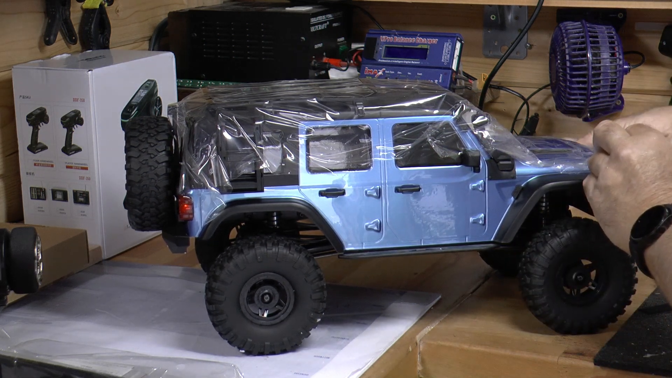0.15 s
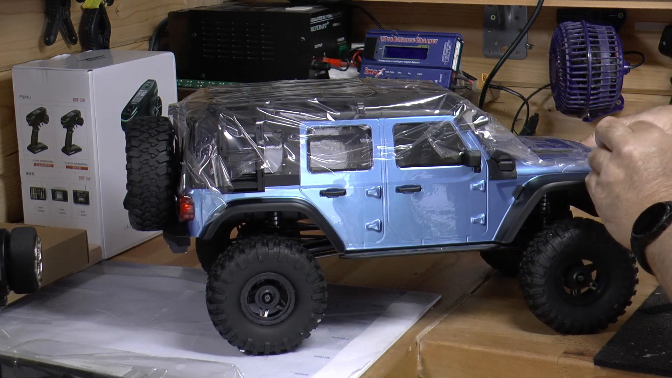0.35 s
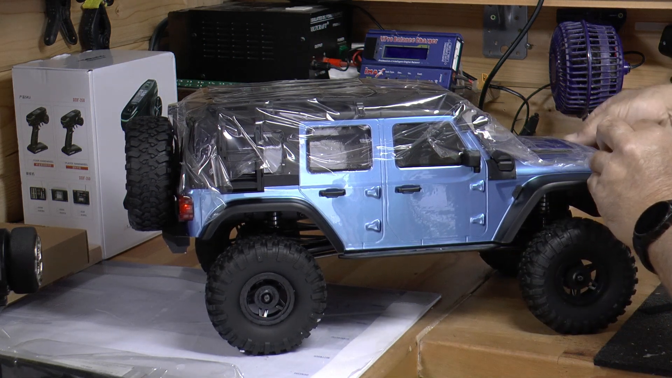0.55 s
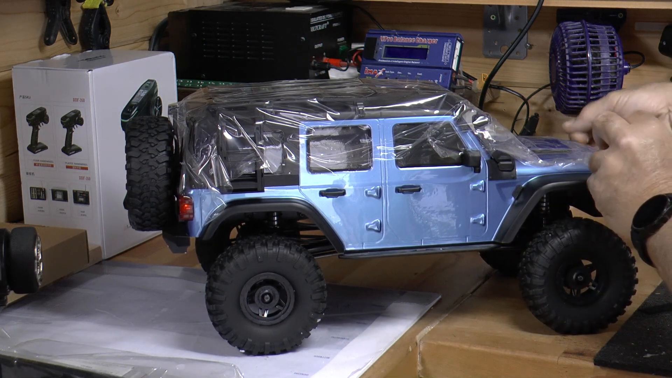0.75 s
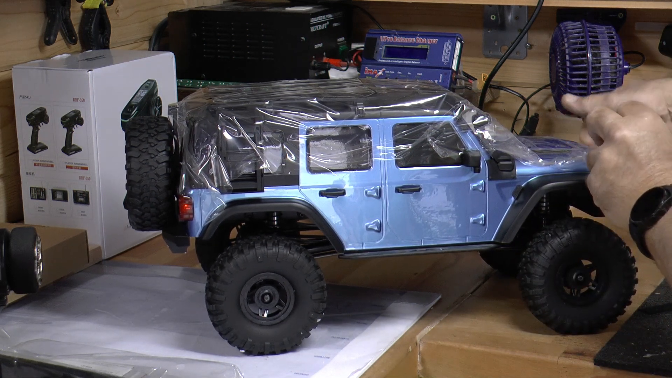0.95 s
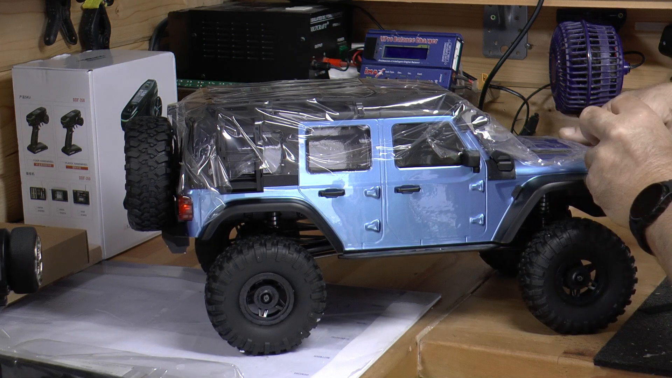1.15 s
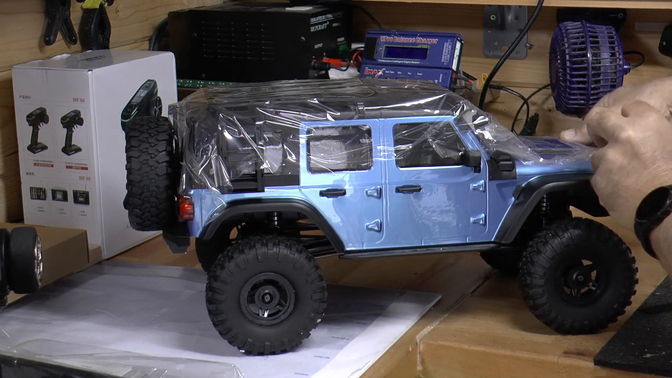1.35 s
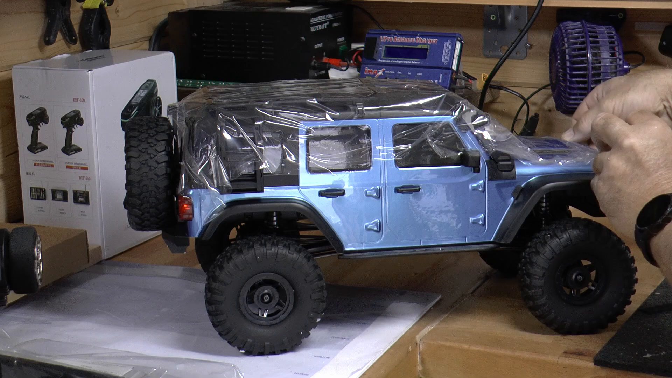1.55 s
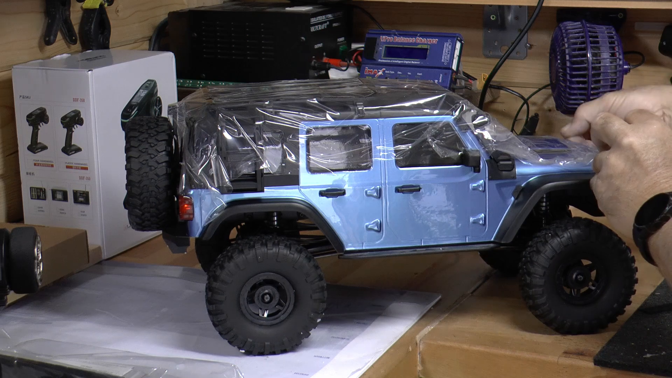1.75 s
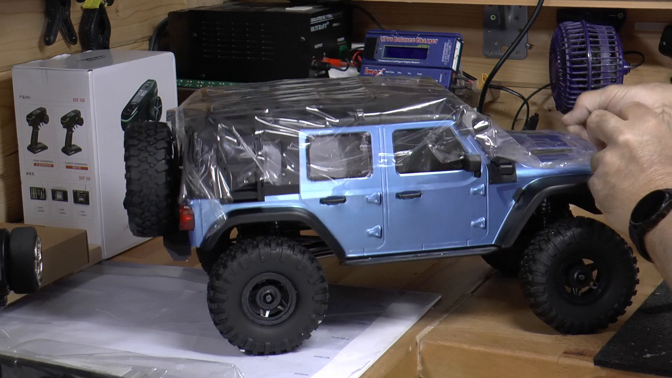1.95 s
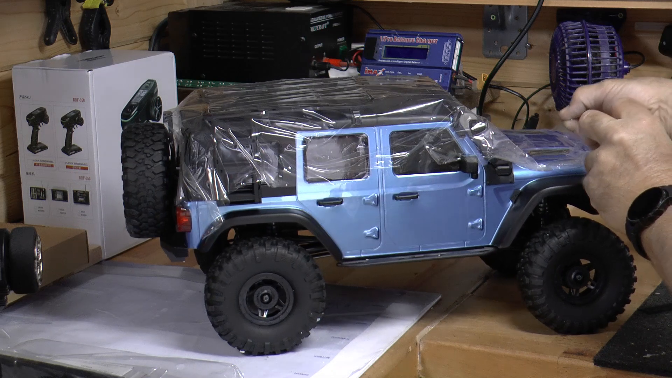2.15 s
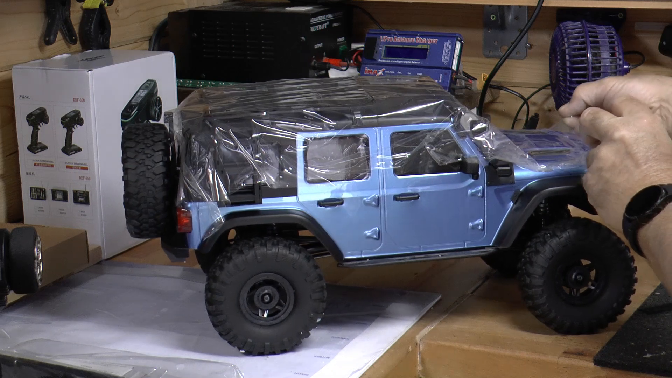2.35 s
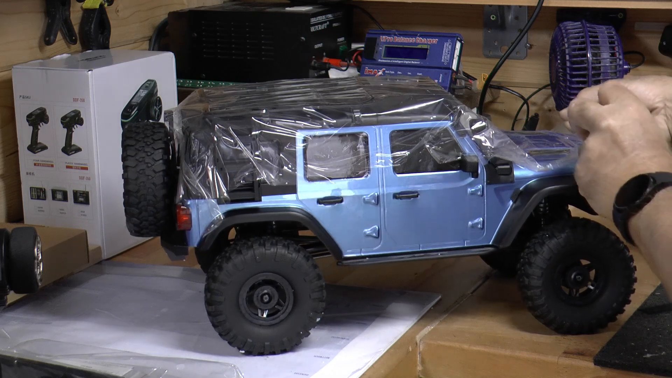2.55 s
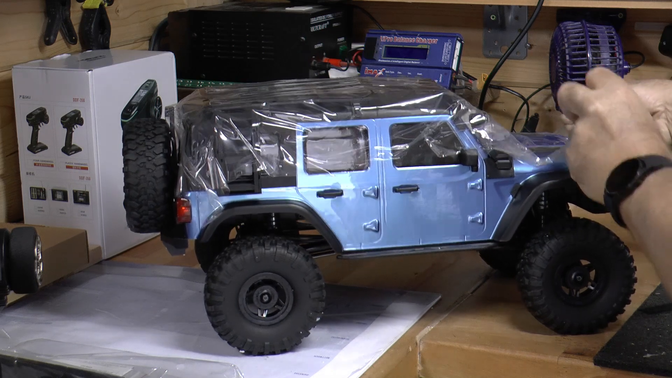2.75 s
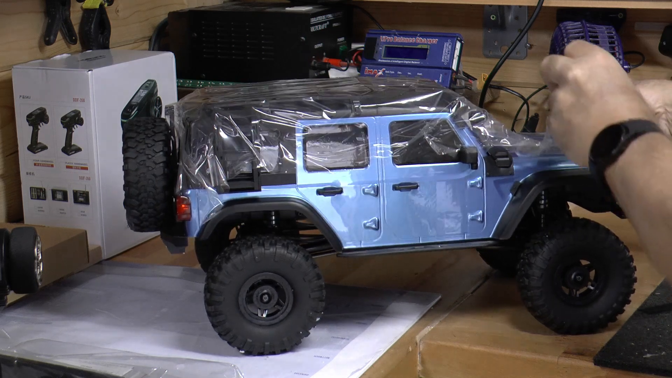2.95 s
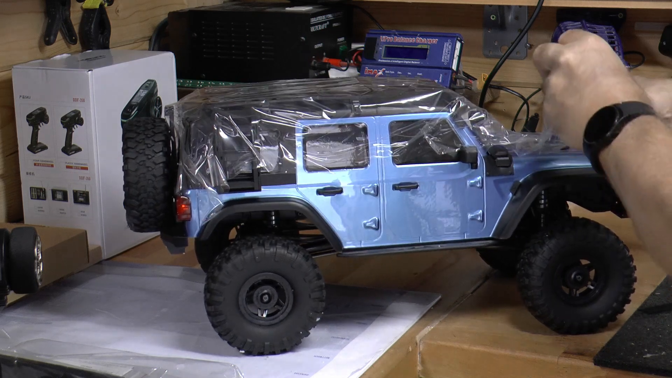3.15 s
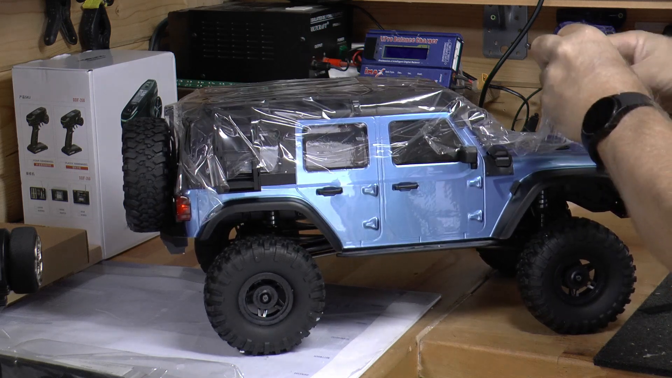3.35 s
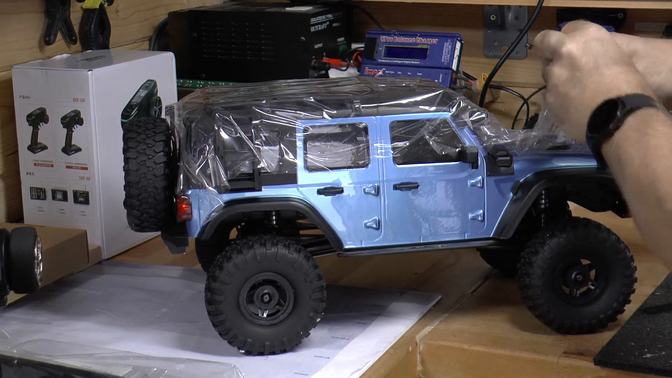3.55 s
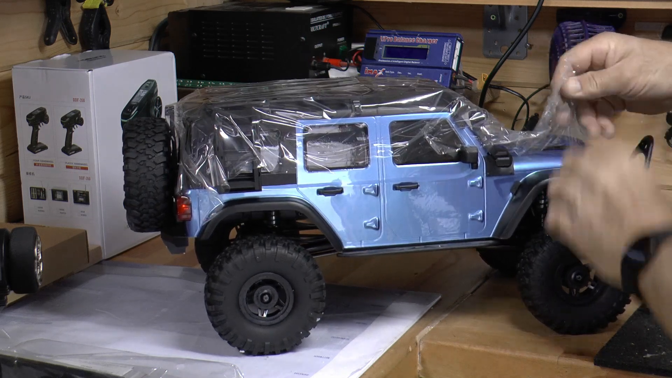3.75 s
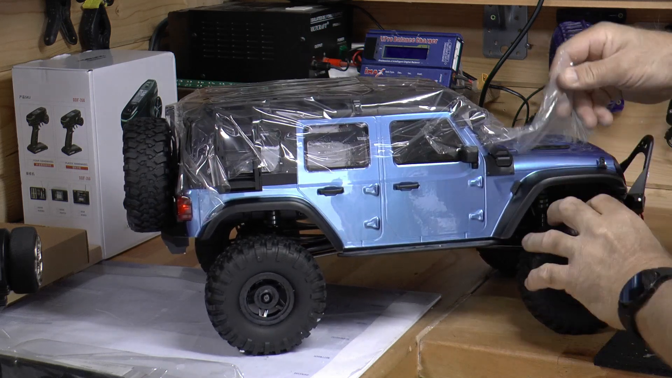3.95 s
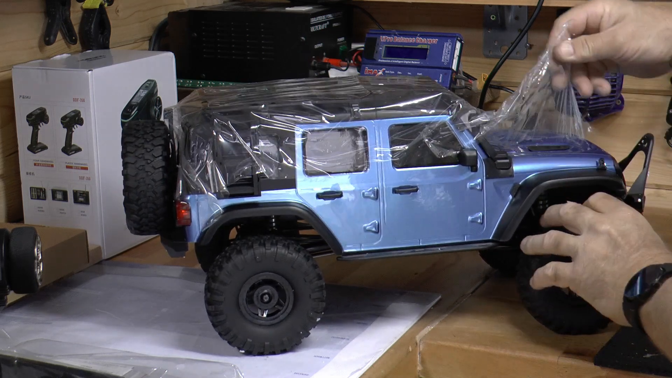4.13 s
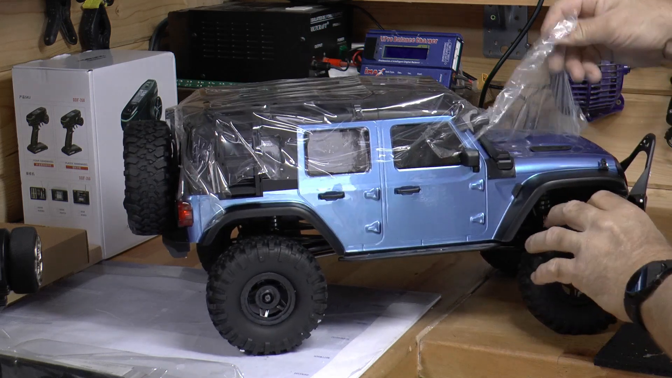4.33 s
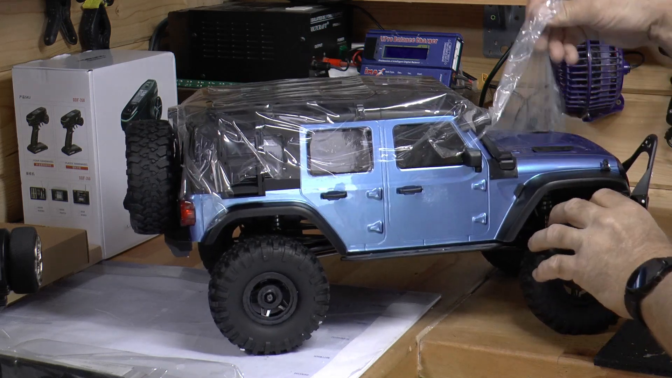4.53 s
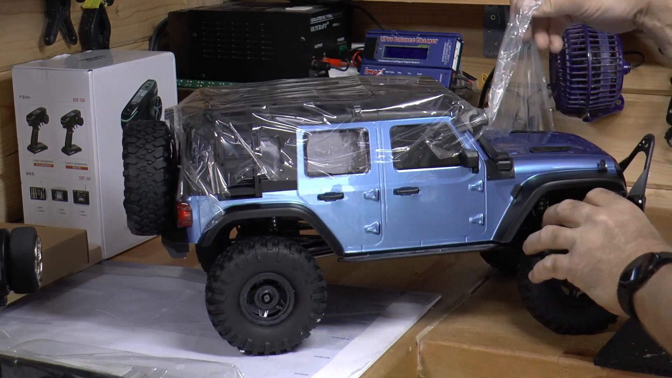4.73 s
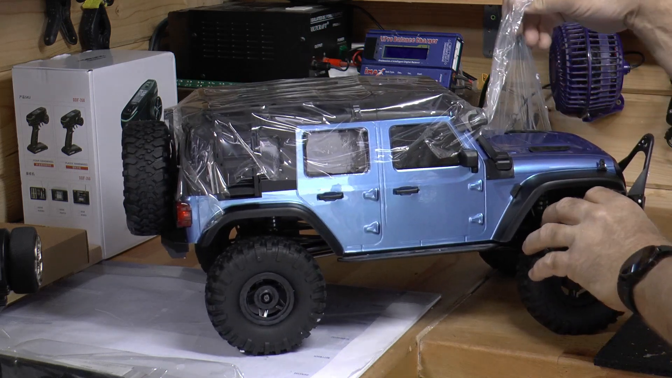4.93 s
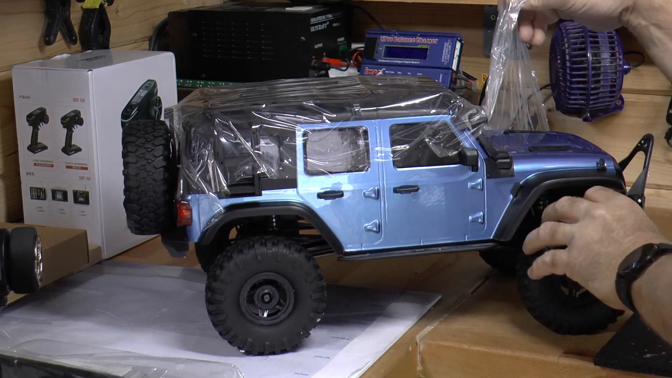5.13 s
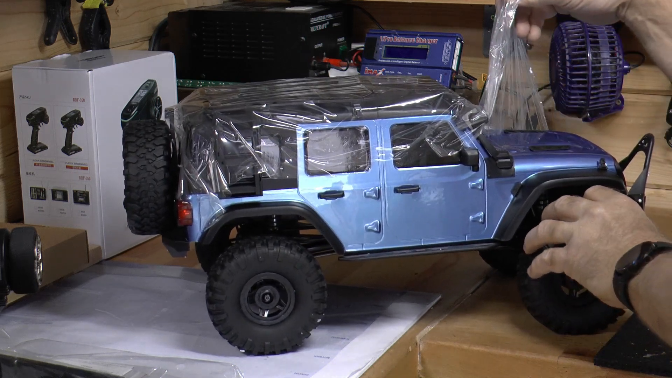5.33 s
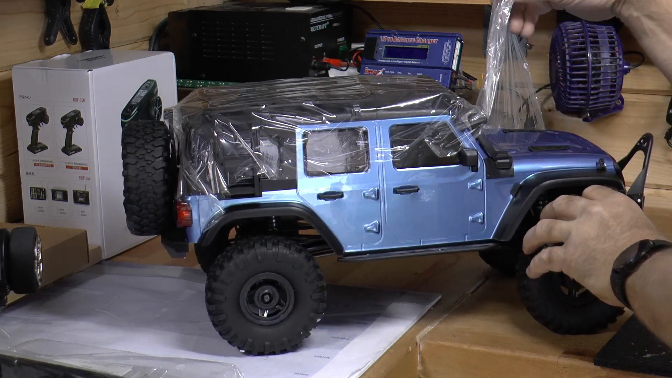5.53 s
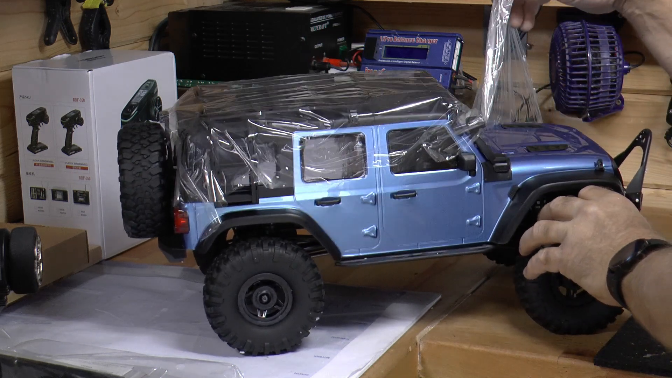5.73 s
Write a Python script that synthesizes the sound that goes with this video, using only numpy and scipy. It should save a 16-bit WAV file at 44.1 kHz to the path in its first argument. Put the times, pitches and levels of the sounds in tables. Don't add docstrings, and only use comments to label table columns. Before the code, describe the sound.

Thin, stiff plastic film is worked loose from a hollow toy vehicle on a workshop bench, heard close and slightly right of centre with a short, small-room tail. At first there are only small ticks and faint rustle, with sharper snaps around 0.5 and 0.8 s. From 1 to 1.6 s it is sparse and quiet; then crackling thickens, with strong snaps near 2.0, 2.5 and 2.8 s and a loud rip at 2.9. Softer tearing and rustling run from 3.0 to 3.7 s, with a dull bump about 3.4. Loud snaps and dense rips break out at 4.0-4.1 and 4.3-4.7 s, making the shell knock hollowly. A hard crack at 5.0 is followed by dry ticks, then a loud cluster around 5.4. A tiny quickening creak at 5.6 leads to a short tear and fading ticks. Low room hum and faint hiss continue throughout.

```python
import sys
import numpy as np
from scipy import signal
from scipy.fft import rfft, irfft
from scipy.io import wavfile
from scipy.ndimage import uniform_filter1d

SR = 44100
rng = np.random.default_rng(int(sys.argv[2]) if len(sys.argv) > 2 else 0)


def attenuation_scalar(level_db):
    decades = np.asarray(level_db, float) / 20
    return 10 ** decades


def materialize(psi):
    bounded = np.clip(np.atleast_2d(psi).T, -1, 1)
    quanta = np.round(bounded * 32767).astype(np.int16)
    wavfile.write(sys.argv[1], SR, quanta)


N = 259746


def evened(x):
    return x / np.sqrt(np.mean(x ** 2) + 1e-20)


def read(points, hz):
    f, value = np.transpose(points)
    return np.interp(np.log(hz + 1), np.log(f + 1), value)


def add(mix, start_s, sound):
    part = mix[round(start_s * SR):][:len(sound)]
    part += sound[:len(part)]


def snaps():
    # start_s, peak_db, pitch_hz, brightness_db
    corner_snaps = [(0.4988, -13, 4430, -25), (0.5249, -18, 6100, -11.5), (0.7755, -17, 7600, -12.5),
                    (0.825, -15, 3200, -17.5), (0.856, -19, 4300, -12), (0.865, -10.5, 4360, -11),
                    (1.3623, -22, 3480, -14), (1.6356, -24, 3500, -20), (1.7512, -19.5, 10400, -7),
                    (1.7722, -18.5, 4360, -19), (1.91, -17.5, 9900, -2), (1.9323, -18.5, 1370, -37),
                    (2.0067, -14.5, 9100, -13), (2.0272, -9, 9700, -9.5), (2.0763, -14, 4170, -15),
                    (2.173, -22.5, 3100, -22), (2.1904, -13.5, 4230, -12), (2.2434, -14.5, 3270, -17),
                    (2.2794, -14.5, 4000, -13), (2.3545, -12, 3230, -16.5), (2.4074, -15, 5860, -18.5),
                    (2.445, -17.5, 4800, -12), (2.4662, -8, 2500, -16.5), (2.482, -4.5, 2520, -18.5),
                    (2.5181, -8, 2450, -18), (2.6726, -17.5, 4040, -12), (2.7567, -4.5, 2520, -15.5),
                    (2.8263, -9, 4220, -17), (2.8646, -16.5, 2310, -17), (2.887, -12.5, 2460, -18)]
    pull_snaps = [(2.907, -3, 2480, -18), (2.9948, -12, 5300, -18.5), (3.242, -14.5, 5950, -12),
                  (3.6317, -12.5, 3950, -16), (3.98, -19, 2650, -15), (3.9932, -4.5, 4420, -18),
                  (4.008, -6, 3720, -19), (4.0908, -11.5, 1700, -28), (4.2257, -22, 4100, -19.5),
                  (4.332, -19, 1930, -11), (4.3395, -10.5, 4900, -12), (4.445, -8.5, 1960, -24.5),
                  (4.4541, -10.5, 4430, -16), (4.4888, -15.5, 2980, -20), (4.5148, -3.5, 2880, -12.5),
                  (4.5317, -7.5, 1810, -26), (4.7037, -19.5, 4400, -18), (4.731, -18, 4500, -19),
                  (4.7673, -16.5, 4580, -20), (4.797, -14.5, 4970, -17.5), (4.8203, -15.5, 2660, -20),
                  (4.8662, -16, 1910, -41), (5.028, -2.5, 5940, -19), (5.1626, -14.5, 5200, -12),
                  (5.2966, -16.5, 4100, -13), (5.3803, -6.5, 3960, -19.5), (5.4045, -2, 4200, -18),
                  (5.4488, -3.5, 4480, -25.5), (5.4637, -5.5, 4100, -15.5), (5.672, -16, 4000, -16)]
    run_slips = [(1.7997, -21.5, 4500, -12), (1.822, -34, 7100, -2), (1.8425, -36, 7100, -6),
                 (1.872, -15, 3900, -25), (2.0467, -15, 4400, -14), (2.2002, -23, 4400, -16),
                 (2.207, -14.5, 3730, -13), (2.2216, -14.5, 4040, -3), (2.487, -8, 3420, -19),
                 (2.9394, -8, 2730, -21), (3.0543, -24.5, 6700, -17), (3.5244, -20, 9500, -17),
                 (3.5744, -23, 4130, 2), (4.0152, -4, 3760, -16), (4.027, -8.5, 2580, -18),
                 (4.04, -24, 2870, -18), (4.0844, -11.5, 1980, -18), (4.0976, -8.5, 1710, -27),
                 (4.126, -12.5, 2840, -19), (4.346, -11, 3020, -11), (4.3604, -6, 6850, -10),
                 (4.388, -11, 2020, -29), (4.4124, -11, 1900, -25), (4.5053, -11.5, 4400, -25),
                 (4.5622, -11, 4460, -11), (4.5688, -12, 4400, -30), (4.5826, -11, 2800, -14),
                 (4.5986, -9.5, 1950, -19), (4.6135, -9.5, 6940, -19), (4.6442, -10.5, 6340, -23),
                 (4.6564, -13, 1950, -13), (4.832, -14, 2720, -28), (4.846, -8, 6550, -14),
                 (5.3661, -15, 7650, -13)]
    corner_ticks = [(0.0546, -29.5, 2610, -21), (0.1422, -31.5, 3250, -12), (0.1523, -27, 3530, -12),
                    (0.197, -26.5, 4100, -22), (0.2155, -24.5, 2010, -25.5), (0.253, -29.5, 6220, -20),
                    (0.274, -29, 2030, -32), (0.289, -24, 4260, -27), (0.3019, -24, 2000, -26),
                    (0.3261, -20, 2650, -25), (0.4293, -30, 3570, -13), (0.4646, -28, 4170, -30),
                    (0.612, -30, 4260, -7), (0.636, -27, 2200, -17), (0.707, -29.5, 3140, -6),
                    (0.7966, -22, 3010, -3), (1.0499, -32, 2250, -23), (1.1057, -31.5, 4160, -22),
                    (1.1536, -23.5, 7700, -14), (1.2273, -36.5, 1950, -36), (1.4039, -29, 3180, -13),
                    (1.4466, -24.5, 3070, -14), (0.8735, -13, 4200, -14), (1.5833, -28.5, 1810, 4),
                    (1.7174, -28.5, 9300, -14), (1.963, -24, 4180, -15), (2.324, -25, 3090, -15),
                    (2.584, -22, 2960, -20.5), (2.647, -27.5, 7350, -15), (2.716, -29, 2920, -28)]
    pull_ticks = [(3.5972, -17, 6550, -16), (3.722, -27.5, 6700, -13), (3.745, -27.5, 3950, -11),
                  (3.7698, -22.5, 6330, -10), (3.805, -26.5, 5230, -13), (3.8534, -21, 1780, -20),
                  (3.886, -22.5, 1770, -20), (3.9658, -25, 4200, 4), (4.2555, -21, 2930, -12),
                  (4.296, -28, 4180, -13), (4.3235, -28.5, 4800, -12), (4.501, -18, 3000, -17),
                  (4.9439, -20, 6570, -16), (4.9653, -17.5, 5060, -8), (4.9747, -21, 5160, -11),
                  (4.987, -19, 4300, -16), (5.0034, -22, 6210, -2), (5.0891, -21, 4400, -4),
                  (5.1092, -23, 3260, -4), (5.131, -23, 3250, -13), (5.1998, -19, 6950, -16),
                  (5.215, -17, 9900, -10), (5.2461, -23, 2870, -6), (5.2603, -20, 3250, -26),
                  (5.2754, -23, 2750, -16), (5.6534, -17.5, 4130, -20), (5.7886, -24.5, 4450, -14),
                  (5.8074, -28.5, 4020, 2), (5.823, -28, 2330, -15), (5.874, -27, 3050, -21)]
    more_ticks = [(.9612, -43, 4200, 3), (0.9983, -40, 1900, -38), (1.0176, -39, 2570, -33),
                  (1.07, -36.5, 6000, -10), (0.411, -36, 3500, -20), (1.1148, -31.5, 4200, -24),
                  (1.3516, -36, 4800, -17), (1.424, -40, 3000, -14), (1.4336, -39, 3400, -12),
                  (1.4757, -28.5, 4200, -11), (1.5495, -31.5, 2700, -3), (1.5705, -33, 4500, -10),
                  (1.644, -23.5, 10000, -3), (1.657, -25, 9300, 0), (1.704, -40, 9000, -4),
                  (1.732, -25, 9000, -11), (2.1673, -42, 4140, 0), (4.923, -21, 5000, -17),
                  (4.9533, -23, 3700, -16), (5.0175, -20, 5200, -23), (5.0976, -32, 7100, -15),
                  (5.151, -26, 3600, -22), (5.3151, -22, 3570, -8), (5.323, -34, 4200, -12),
                  (5.341, -28, 3600, -14), (.9053, -28, 4300, -12), (0.923, -32, 4600, -12),
                  (4.9922, -25, 5200, -12), (5.1207, -30, 3600, -12), (3.4033, -33, 2200, -19),
                  (3.4784, -30, 4900, -9), (3.669, -33, 10000, -3), (2.737, -38, 4000, -8),
                  (4.326, -30, 6000, -8)]
    rip_ms, tick_ms, taut_ms = 8.2, 5.7, 2.4
    taut_from_s, taut_to_s = 4.9, 5.29
    attack_s, softer_per_db = 0.00083, 0.22
    spike_db, spike_s = -2, 0.0014

    events = [(*row, rip_ms) for table in (corner_snaps, pull_snaps, run_slips) for row in table]
    for table in (corner_ticks, pull_ticks, more_ticks):
        for row in table:
            taut = taut_from_s < row[0] < taut_to_s
            events.append((*row, taut_ms if taut else tick_ms))
    events += creak()

    out = np.zeros(N)
    t = np.arange(2048) / SR
    hz = np.fft.rfftfreq(2048, 1 / SR)
    for start_s, peak_db, pitch_hz, bright_db, ms in events:
        ring_db, octaves = (7.0, 0.17) if ms > taut_ms else (12.0, 0.35)
        colour = film_colour(hz, bright_db, pitch_hz, ring_db, octaves)
        rip = irfft(rfft(crackle(len(t), per_s=20000, spread_db=2.0)) * colour)
        level = np.sqrt(uniform_filter1d(rip ** 2, 220) + 1e-9)
        rise = np.minimum(t / (attack_s * attenuation_scalar(-softer_per_db * peak_db)), 1)
        shape = rise * np.exp(-(1000 * t / ms) ** 2.85)
        shape *= 1 + attenuation_scalar(spike_db) * np.exp(-(t / spike_s) ** 2)
        add(out, start_s, attenuation_scalar(peak_db - 11.5) * shape * rip / level)
    return out


def creak():
    gaps_s = 0.0142 * 0.915 ** np.arange(9)
    starts_s = 5.5702 + np.cumsum(gaps_s) - gaps_s
    peak_db, pitch_hz, bright_db, ms = -22, 3120, -17, 1.73
    return [(s, peak_db, pitch_hz, bright_db, ms) for s in starts_s]


def tear(rustle_db):
    # start_s, length_s, start_pull_db, end_pull_db, brightness_db
    runs = [(0.464, 0.016, -45, -27, -23), (0.852, 0.023, -77, -30.5, -14),
            (1.227, 0.074, -51, -53.5, -24.5), (1.567, 0.05, -53, -32, -18.5),
            (1.755, 0.12, -35, -26.5, -11), (2.002, 0.033, -38, -32, -20.5),
            (2.197, 0.02, -21.5, -24.5, -15), (2.467, 0.014, -43, -24, -15),
            (2.919, 0.036, -12.5, -13.5, -15.5), (3.02, 0.045, -36, -35.5, -16),
            (3.128, 0.13, -35.5, -27.5, -13.5), (3.24, 0.062, -46, -32, -13.5),
            (3.289, 0.36, -41.5, -30.5, -14), (3.866, 0.074, -43.5, -39, -26),
            (3.96, 0.038, -32.5, -45, -23.5), (4.032, 0.067, -12, -18, -16.5), (4.34, 0.072, -12, -16, -20),
            (4.522, 0.13, -14.5, -21, -15.5), (4.828, 0.037, -18.5, -23, -15),
            (5.294, 0.11, -34.5, -24.5, -18.5), (5.642, 0.047, -42, -35, -16),
            (5.677, 0.058, -28.5, -35, -16.5)]
    # time_s, pitch_hz, ring_db
    sheet = [(.5, 4100, 6), (1.27, 4130, 4), (1.62, 4150, -5), (1.76, 10100, 8), (1.9, 9900, 4),
             (2.19, 4430, 9), (2.93, 2880, 4.5), (3.2, 3400, 3.5), (3.31, 5030, 8.5), (3.42, 2210, 2),
             (3.6, 5100, 5), (4.06, 3900, 10), (4.11, 1780, -5), (4.42, 1930, 7.5), (4.52, 4400, -0.5),
             (4.85, 6960, 6), (5.36, 6860, 6), (5.68, 4050, 5)]
    start_s, length_s, _, _, bright_db = np.transpose(runs)
    power = crinkled(rustle_db)
    for row in runs:
        add(power, row[0], attenuation_scalar(2 * (pull(*row[:4]) - 5.0)))

    starts = abs(crackle(N, per_s=320, spread_db=0.6))
    clumps = evened(signal.lfilter([1], [1, -np.exp(-1 / (0.002 * SR))], starts))
    jerky = np.clip(2.4 + np.log10(power) / 1.6, 0.22, 0.85)
    clumps = 1.7 + jerky * clumps
    clumps = clumps / np.sqrt(uniform_filter1d(clumps ** 2, 4000))
    slips = crackle(N, per_s=11000, spread_db=1.8) * clumps
    hz, t, z = signal.stft(evened(slips), SR, nperseg=256)

    level_db = 10 * np.log10(np.interp(t * SR, np.arange(N), power))
    faint_db = np.clip(-41.5 - level_db, 0, 15)
    bright_db = np.interp(t, start_s + length_s / 2, bright_db) - 0.42 * faint_db
    time_s, sheet_hz, ring_db = np.transpose(sheet)
    pitch_hz = np.exp(np.interp(t, time_s, np.log(sheet_hz)))
    ring_db = np.interp(t, time_s, ring_db)
    colour = film_colour(hz[:, None], bright_db, pitch_hz, ring_db, octaves=0.11)

    wrinkles = rng.standard_normal(z.shape[::-1]).T
    wrinkles = evened(uniform_filter1d(uniform_filter1d(wrinkles, 3, 0), 18, 1))
    flecks = rng.standard_normal(z.shape[::-1]).T
    flecks = evened(uniform_filter1d(uniform_filter1d(flecks, 4, 0), 2, 1))
    fleck_db = 2.5 * np.interp(t * SR, np.arange(N), jerky + 0.25)
    colour *= attenuation_scalar(1.56 * wrinkles + fleck_db * flecks)
    colour /= np.sqrt((colour ** 2).mean(0))
    sound = signal.istft(z * colour, SR, nperseg=256)[1][:N]
    return np.sqrt(uniform_filter1d(power, 60)) * sound


def pull(start_s, length_s, start_db, end_db):
    t = np.arange(0, length_s + 0.092, 1 / SR)
    release_db_per_s = 370
    held_db = start_db + (end_db - start_db) * np.minimum(t / length_s, 1)
    return held_db - release_db_per_s * np.maximum(t - length_s, 0)


def crinkled(rustle_db):
    crinkle_s, share = 0.004, 0.3
    starts = abs(crackle(N, per_s=140, spread_db=0.5))
    bursts = signal.lfilter([1], [1, -np.exp(-1 / (crinkle_s * SR))], starts)
    return attenuation_scalar(2 * rustle_db) * (1 - share + share * bursts / bursts.mean())


def crackle(count, per_s, spread_db):
    hit, size, sign = rng.random(count), rng.exponential(1, count), rng.standard_normal(count)
    return evened((hit < per_s / SR) * sign * attenuation_scalar(spread_db * np.minimum(size, 4)))


def film_colour(hz, bright_db, pitch_hz, ring_db, octaves):
    # frequency_hz, level_db
    film = [(290, -80), (500, -12), (721, -18.5), (898, -18), (1280, -13), (1680, -4), (1810, -3),
            (3820, 1), (9600, -1.5), (14900, -14), (15700, -16), (16900, -53)]
    tilt_db = (bright_db + 13.5) * np.clip(np.log2((hz + 1) / 5000), -2.2, 1.6) * 0.5
    bump_db = ring_db * np.exp(-(np.log2((hz + 1) / pitch_hz) / octaves) ** 2)
    return attenuation_scalar(read(film, hz) + tilt_db + bump_db)


def shaken(modes, film, shake_db):
    jerks = film / np.sqrt(uniform_filter1d(film ** 2, 3000) + 1e-12)
    drive = abs(jerks) * rng.standard_normal(N) * attenuation_scalar(shake_db)
    out = np.zeros(N)
    for hz, width_hz, db in modes:
        once = resonate(drive, hz, 2.05 * width_hz)
        out += attenuation_scalar(db) * resonate(once, hz, 2.05 * width_hz)
    return out


def resonate(x, hz, width_hz):
    r = np.exp(-np.pi * width_hz / SR)
    poles = [1, -2 * r * np.cos(2 * np.pi * hz / SR), r * r]
    return signal.lfilter([(1 - r * r) / 2, 0, (r * r - 1) / 2], poles, x)


def knocks():
    # start_s, peak_db, pitch_hz, t60_s
    bumps = [(0.326, -57, 378, 0.09), (0.485, -46.5, 348, 0.037), (1.0, -56, 556, 0.022),
             (2.759, -42.5, 369, 0.074), (2.913, -49, 405, 0.076), (3.418, -31, 300, 0.018),
             (3.42, -51, 207, 0.086), (3.436, -50, 290, .05), (3.424, -54, 1090, 0.045),
             (3.485, -58, 187, .07), (3.558, -57.5, 181, .12), (3.728, -56, 175, 0.096),
             (3.3, -56, 350, .06), (3.77, -55, 400, .05), (3.803, -56, 330, .06), (4.3, -55, 380, .04),
             (3.902, -55, 347, .05), (2.833, -51, 402, 0.073), (4.872, -50.5, 380, .09),
             (4.015, -59, 45, .12), (5.04, -50, 165, .11), (5.668, -37, 4050, .05), (5.684, -43, 4000, .05),
             (5.449, -41, 790, 0.027), (5.464, -41, 1100, 0.028), (3.634, -38, 400, 0.017),
             (4.12, -44.5, 333.5, 0.1), (4.358, -37, 430.5, 0.13), (4.36, -50, 198, 0.093),
             (4.518, -48.5, 175, 0.15), (4.58, -47.5, 140, 0.1), (5.027, -55.5, 50.3, 0.081),
             (5.4, -54, 45, 0.097), (5.028, -42, 606, .04), (.49, -52, 1060, 0.068),
             (2.765, -50, 506, 0.063), (4.035, -35.5, 720, 0.078), (4.56, -39, 593, 0.1),
             (4.576, -40.5, 384, 0.13), (4.605, -36.5, 373, 0.11), (4.841, -51, 146, 0.12),
             (2.291, -64, 106.5, .2), (3.636, -57, 165, 0.08), (4.371, -46, 292, 0.16),
             (1.27, -62, 306, 0.063), (5.461, -51.5, 118, 0.08), (5.406, -48, 373, 0.03)]
    out, t = np.zeros(N), np.arange(8000) / SR
    for start_s, peak_db, hz, t60_s in bumps:
        pair = np.sin(2 * np.pi * hz * t) + 0.18 * np.sin(2 * np.pi * 1.4 * hz * t)
        decay = attenuation_scalar(peak_db + 17.0 - 60 * t / max(t60_s, 0.02))
        add(out, start_s, decay * np.minimum(t / 0.0071, 1) * pair)
    return out


def shelf(x, delay_s, echo_db):
    taps = np.zeros(400)
    taps[round(delay_s * SR) + np.array([0, 9, 23, 44])] = [1, -0.5, 0.45, -0.3]
    return x + attenuation_scalar(echo_db) * signal.oaconvolve(x, taps)[:N]


def room(x, side_db):
    # frequency_hz, side_against_mid_db
    spread = [(40, 0), (200, -19), (550, -9), (1500, -12.5), (3500, -14), (6200, -21), (8600, -10),
              (13000, -18.5)]
    turn = 2 * np.pi * 31 * np.arange(N) / SR
    mid, side = np.zeros((2, N))
    for k in range(3):
        share = np.sqrt(2 / 3) * np.cos(turn + k * np.pi / 3)
        echoes = signal.fftconvolve((x * share)[None], tails(), axes=1)[:, :N]
        mid += echoes[0]
        side += echoes[1]
    side = irfft(rfft(side) * attenuation_scalar(side_db + read(spread, np.fft.rfftfreq(N, 1 / SR))), N)
    return mid + np.array([[1], [-1]]) * side


def tails():
    # frequency_hz, t60_s
    decay = [(200, 0.19), (530, 0.16), (1400, 0.12), (3700, 0.11), (7000, 0.11), (12000, 0.085)]
    taps = np.zeros((2, SR // 2))
    at = np.arange(220, SR // 2 - 16, 16)
    at = at + rng.integers(0, 16, (2, len(at)))
    np.put_along_axis(taps, at, rng.choice([-1., 1.], at.shape), 1)
    hz, t, z = signal.stft(taps, SR, nperseg=256)
    fade = attenuation_scalar(-60 * t / read(decay, hz)[:, None])
    tail = signal.istft(z * fade, SR, nperseg=256)[1]
    return tail / np.linalg.norm(tail[0])


def hum():
    # frequency_hz, level_db
    spectrum = [(15, -36), (25, 37), (163, 24.5), (266, 30.5), (358, 3), (496, -3), (726, 25.5), (902, -29),
                (1930, 12), (4240, -17.5), (10400, -84.5), (14000, -1), (16500, -58)]
    # frequency_hz, likeness (1 = identical)
    likeness = [(25, 1), (60, 0.99), (150, 0.95), (600, 0.25), (2000, 1), (9000, 1)]
    frames, hz = N // 256 + 5, np.fft.rfftfreq(1024, 1 / SR)
    a, b, c, d, patches = rng.standard_normal((frames, 513, 5)).T
    patches = evened(uniform_filter1d(uniform_filter1d(patches, 10, 0), 14, 1))
    same = np.clip(read(likeness, hz), -1, 1)[:, None]
    left = a + 1j * b
    right = same * left + np.sqrt(1 - same ** 2) * (c + 1j * d)
    z = np.array([left, right]) * attenuation_scalar(read(spectrum, hz)[:, None] + 2.0 * patches)
    return attenuation_scalar(-62.5) * evened(signal.istft(z, nperseg=1024, noverlap=768)[1][:, :N])


def hiss():
    a, b = rng.standard_normal((N, 2)).T
    taps = signal.firwin(127, [9000, 14500], pass_zero=False, fs=SR)
    pair = np.array([a + 0.1 * b, a - 0.1 * b])
    return attenuation_scalar(-75.5) * evened(signal.oaconvolve(pair, taps[None], "same"))


def scene():
    # time_s, rustle_db, grip_db
    handling = [(0.0, -48.5, -0.5), (0.69, -44.5, -7), (1.33, -53.5, -1.5), (1.52, -39.5, 0),
                (1.88, -46, -0.5), (2.38, -38.5, -3), (2.59, -45, -2.5), (2.77, -43, -6),
                (2.89, -34.5, 1.5), (3.11, -42, -2.5), (3.49, -33, -2), (3.69, -46, 6.5), (4.3, -43.5, 1.5),
                (4.501, -82, 3), (4.88, -31, -2.5), (5.25, -34.5, -3), (5.56, -38.5, -4),
                (5.89, -52.5, 2.5)]
    # frequency_hz, width_hz, level_db
    shell_modes = [(350.4, 47, -1.5), (443.2, 19, -2.5), (564, 40, -13), (738, 46, -5), (1102, 18, -5.5),
                   (1434, 37, -9.5)]
    # frequency_hz, width_hz, level_db
    board_modes = [(129.5, 21, -4.5), (172.8, 11.3, -2)]
    time_s, *columns = np.transpose(handling)
    rustle_db, grip_db = (np.interp(np.arange(N) / SR, time_s, c) for c in columns)
    film = shelf(snaps() + tear(rustle_db - 9.0), delay_s=0.0049, echo_db=-14.5)

    keep = np.exp(-1 / (0.014 * SR))
    effort_db = 40 + 10 * np.log10(signal.lfilter([1 - keep], [1, -keep], film ** 2) + 1e-6)
    shell = shaken(shell_modes, film, -33 + grip_db + 0.7 * effort_db)
    board = shaken(board_modes, film, -33.5 + 0.44 * grip_db + 0.26 * effort_db)
    near = film + shell + board + knocks()
    direct = near * attenuation_scalar([[-0.3], [0.3]])
    return direct + attenuation_scalar(-5.5) * room(near, side_db=3.0) + hum() + hiss()


def top_cut(x):
    return signal.sosfilt(signal.butter(12, 16800, fs=SR, output="sos"), x)


def record(dry):
    # frequency_hz, width_hz, depth_db
    dips = [(492, 14.2, -32.5), (910, 23, -23), (1532, 47, -12)]
    hz = np.fft.rfftfreq(N, 1 / SR)
    dips_db = sum(db / (1 + (2 * (hz - f) / width_hz) ** 2) for f, width_hz, db in dips)
    heard = irfft(rfft(dry, axis=1) * attenuation_scalar(dips_db), N, axis=1)
    ceiling = attenuation_scalar(-1.5)
    rounded = ceiling * np.tanh(heard / ceiling)
    low_pass = signal.firwin(63, 16000, fs=SR)[None]
    return top_cut(signal.oaconvolve(rounded, low_pass, "same"))


dry = scene()
out = record(dry)
materialize(out)
```